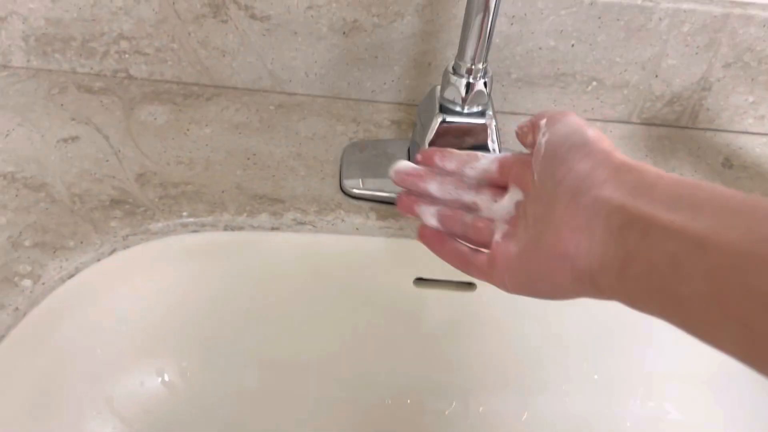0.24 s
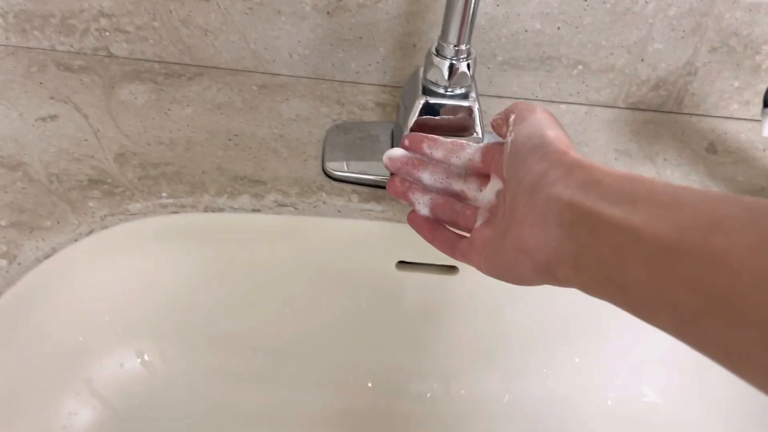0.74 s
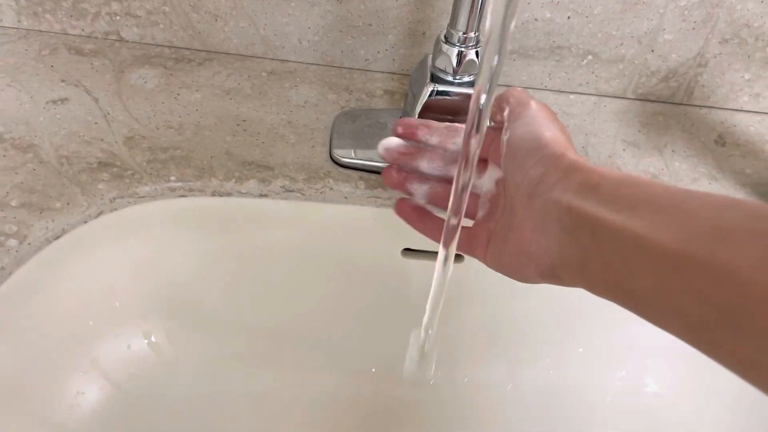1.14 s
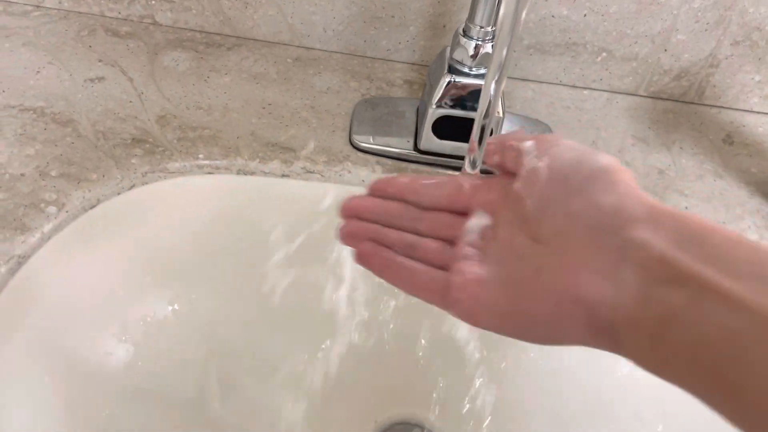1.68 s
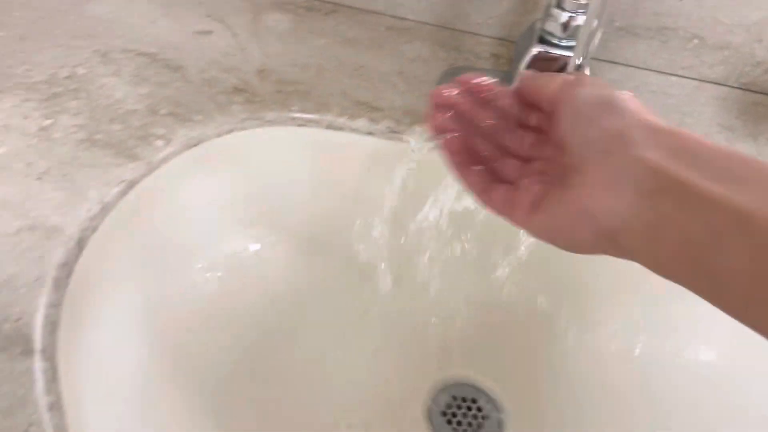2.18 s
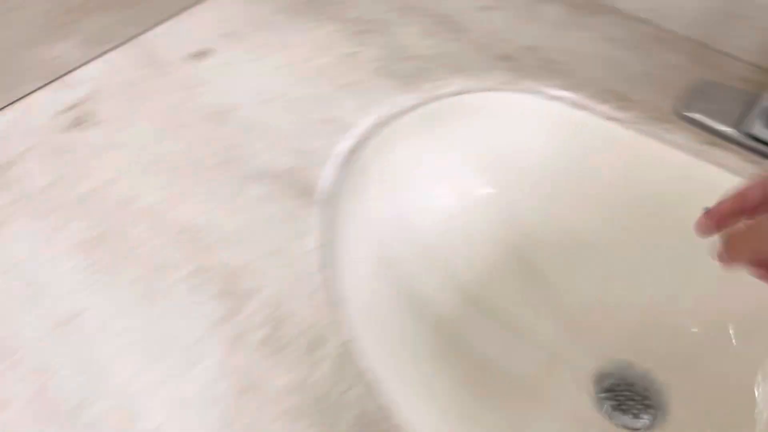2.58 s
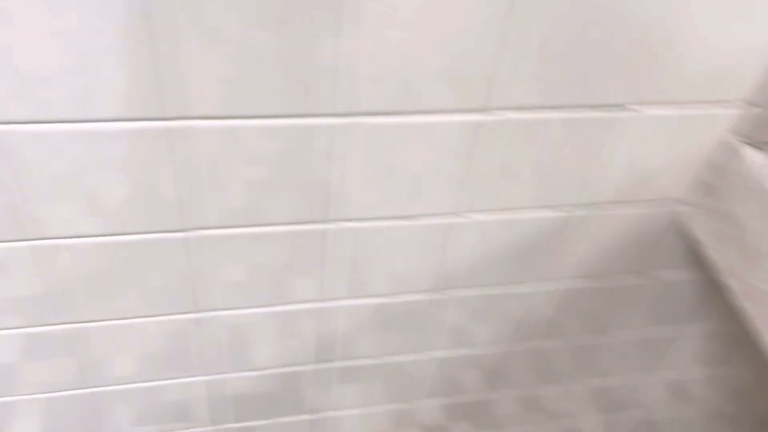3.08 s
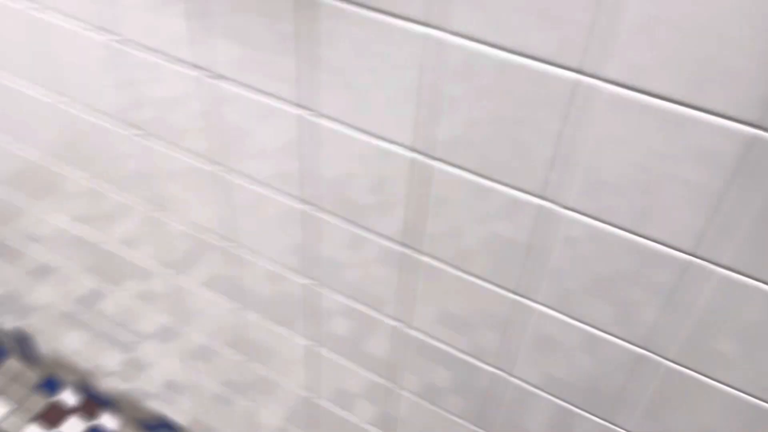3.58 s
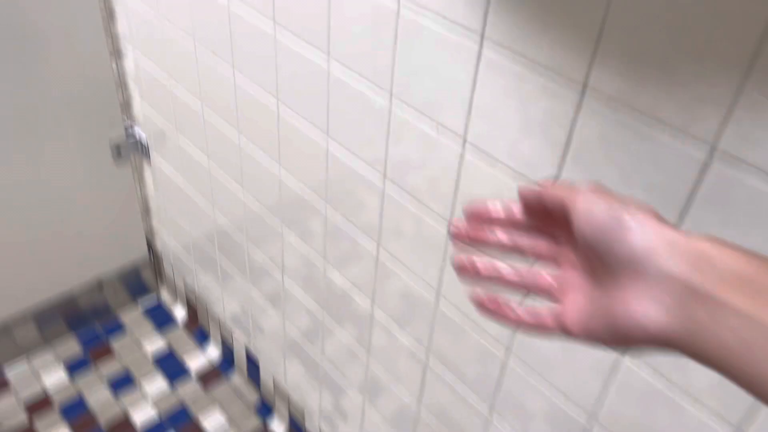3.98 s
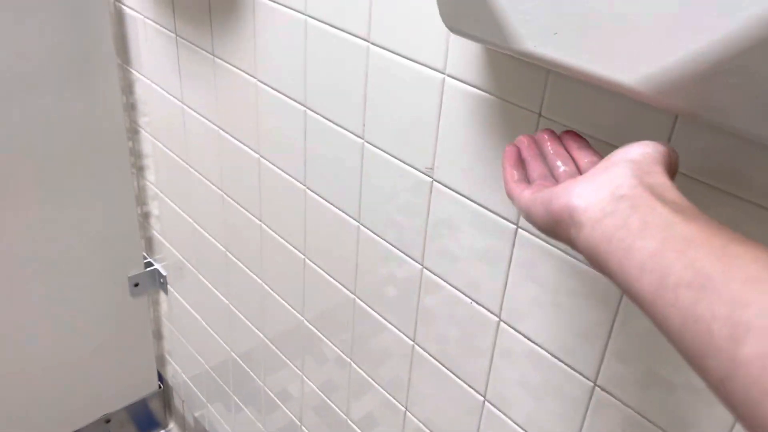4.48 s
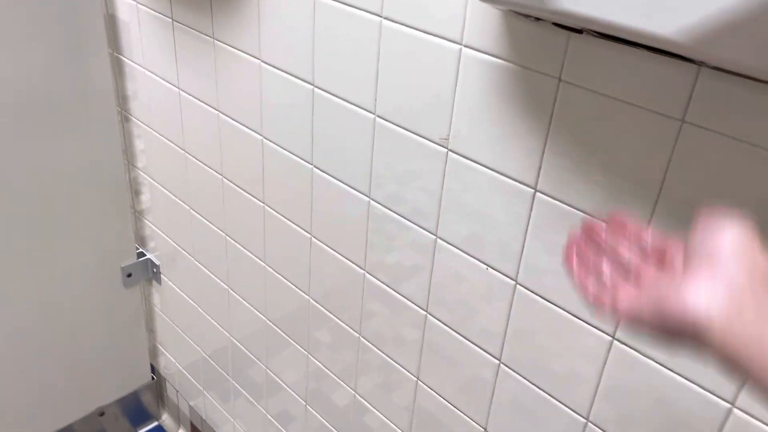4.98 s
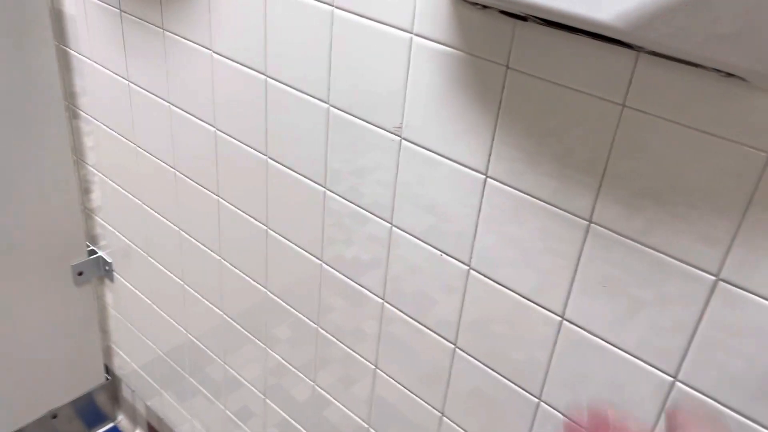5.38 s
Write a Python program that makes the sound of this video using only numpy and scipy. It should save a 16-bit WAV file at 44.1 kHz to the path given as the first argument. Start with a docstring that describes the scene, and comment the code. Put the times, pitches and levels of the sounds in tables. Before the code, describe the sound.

In a droning tiled restroom, a tap clicks open, hisses and splatters over a soapy hand, then turns distant and shuts off with a spurt.

```python
"""Tap in a tiled restroom.

Ventilation drones through the walls: noise in room resonances plus drifting hum and thin fan tones.
A quiet noise layer sets in abruptly before the tap. The tap clicks open: shaped noise sings in the pipe,
hisses from the aerator and sprays on hand and basin. Drops, foam and gulps are damped sines; knocks are
noise puffs with basin rings. The phone turns away from the basin to a tiled wall, near spray gives way
to spray off the tiles, the tap shuts and gives a last spurt.
"""
import sys
import numpy as np
from scipy import signal
from scipy.fft import rfft, irfft, next_fast_len
from scipy.io import wavfile
from scipy.ndimage import uniform_filter1d, map_coordinates

SR = 44100
rng = np.random.default_rng(int(sys.argv[2]) if len(sys.argv) > 2 else 0)


def wav_out(sig):
    """Save sig, one row per channel (or a flat mono array), as 16-bit PCM at SR to the path in sys.argv[1]."""
    wavfile.write(sys.argv[1], SR, np.round(np.clip(np.atleast_2d(sig).T, -1, 1) * 32767).astype(np.int16))


N = 248724  # samples


def amp(db):
    """dB to gain."""
    return 10 ** (np.asarray(db) / 20)


def unit(x):
    """x at rms 1."""
    return x / np.sqrt(np.mean(x ** 2) + 1e-20)


def between(pair, share):
    """Blend from the first value to the second."""
    return pair[0] + (pair[1] - pair[0]) * np.clip(share, 0, 1)


def along(points, hz, axis=1):
    """One column of a frequency table, read on a log axis."""
    p = np.transpose(points)
    return np.interp(np.log(hz + 1), np.log(p[0] + 1), p[axis])


def curves(rows):
    """One value per sample for each column after the time."""
    s, *cols = np.transpose(rows)
    return [np.interp(np.arange(N) / SR, s, c) for c in cols]


def wobble(rate_hz):
    """Smooth random curve, rate_hz knots a second."""
    knots = rng.standard_normal(int(N * rate_hz / SR) + 4)
    return map_coordinates(knots, [np.arange(N) * rate_hz / SR])


def filtered(x, response):
    """x times a complex response of frequency."""
    m = next_fast_len(N + SR // 2)
    spectrum = rfft(x, m) * response(np.fft.rfftfreq(m, 1 / SR))
    return irfft(spectrum, m)[..., :x.shape[-1]]


def peaks(modes):
    """Gain of resonances (frequency [Hz], width [Hz], level [dB]) whose powers add."""
    def gain(f):
        return np.sqrt(sum(amp(2 * db) * (f * w) ** 2 / ((c * c - f * f) ** 2 + (f * w) ** 2)
                           for c, w, db in modes))
    return gain


def shape(points):
    """Gain curve through a table (frequency [Hz], level [dB])."""
    return lambda f: amp(along(points, f))


# left-right correlation: (frequency [Hz], far from source [-1..1], near source [-1..1])
CORRELATION = [(100, 0.97, 0.69), (198, 0.72, .9), (360, 0.3, 0.9), (970, 0.05, 0.83), (2560, 0.15, 1),
               (3630, 0.3, 0.77), (4470, 0.88, 1), (5900, 0.1, 0.065), (7020, 1, 1), (10300, 0.89, 0.72),
               (11500, 1, 0.46), (12900, 0.85, 0.44), (14500, 1, 0.98)]


def rush(gain, near, patchy_db):
    """Stereo noise of rms 1: random time-frequency patches, mid/side mixed to the set correlation."""
    z = signal.stft(rng.standard_normal((2, N)), nperseg=256)[2]
    field = uniform_filter1d(rng.standard_normal(z.shape[1:]), 5, 0)
    field = uniform_filter1d(field, 8, 1)
    pair = signal.istft(z * amp(patchy_db * unit(field)), nperseg=256)[1][:, :N]

    def mid_side_gain(hz):
        angle = np.arccos(np.clip(along(CORRELATION, hz, axis=1 + near), -1, 1)) / 2
        return gain(hz) * [np.cos(angle), np.sin(angle)]

    mid, side = filtered(pair, mid_side_gain)
    return unit(np.array([mid + side, mid - side]))


def bubbles(s, db, hz, pan_db, cycles, rise, swell_cycles=0.73):
    """Trapped bubbles: damped sines that swell, die over some cycles and rise in pitch."""
    t = np.arange(SR // 25) / SR
    u = hz[:, None] * t  # cycles elapsed
    life = np.reshape(np.clip(cycles, 1, 30), (-1, 1))
    wave = np.sin(2 * np.pi * u * (1 + rise * np.minimum(u / life, 3)))
    wave = wave * np.exp(-u / life) * (1 - np.exp(-u / swell_cycles))
    at = ((s * SR).astype(int)[:, None] + np.arange(len(t))).ravel()

    def channel(side):
        gain = amp(db + side * pan_db / 2)[:, None]
        return np.bincount(at, (gain * wave).ravel(), N + SR)[:N]

    return np.array([channel(1), channel(-1)])


def spatter(s, db, t60_s):
    """Short noise bursts, as when a drop shatters."""
    t = np.arange(SR // 50) / SR
    at = ((s * SR).astype(int)[:, None] + np.arange(len(t))).ravel()
    burst = amp(db[:, None] - 60 * t / t60_s) * rng.standard_normal((len(s), len(t)))
    bursts = np.bincount(at, burst.ravel(), N + SR)[:N]
    return filtered(bursts, peaks([(3000, 2000, 0.004), (5850, 9700, 0.0069)]))


# tile decay: (frequency [Hz], t60 [s])
TILE_DECAY = [(200, 0.15), (2000, 0.23), (8000, 0.059), (15000, 0.029)]


def room(x):
    """Tiled walls: a noise tail, 130 samples late, each frequency dying at its own speed."""
    hz, t, z = signal.stft(rng.standard_normal((2, SR)), SR, nperseg=256)
    decay = amp(-60 * t / along(TILE_DECAY, hz)[:, None])
    tail = signal.istft(z * decay, SR, nperseg=256)[1]
    late = np.pad(x, (130, 0))[None]
    return signal.fftconvolve(late, tail / np.linalg.norm(tail[0]), axes=1)[:, :N]


OPEN_S, SHUT_S = .928, 4.932  # valve
# quiet noise layer: (frequency [Hz], level per Hz [dB])
LAYER_SHAPE = [(1500, -28), (3500, 3), (6000, -1), (10000, -3.5), (13000, -10), (15600, -20)]
LAYER_DB, LAYER_START_S, LAYER_RISE_S, LAYER_FADE_S = -75.5, 0.51, 0.03, 0.56  # fade starts at SHUT_S


def quiet_noise_layer():
    """Quiet shaped stereo noise: abrupt onset, level hold, linear fade."""
    t = np.arange(N) / SR
    rise = np.clip((t - LAYER_START_S) / LAYER_RISE_S, 0, 1)
    fade = np.clip(1 - (t - SHUT_S) / LAYER_FADE_S, 0, 1)
    return amp(LAYER_DB) * rise * fade * rush(shape(LAYER_SHAPE), near=0, patchy_db=3.5)


# phone place: (time [s], turn from basin to wall [0-1], distance from tap [arm lengths])
PHONE_PLACE = [(0, 0.02, 0.97), (2.4, 0.18, 0.98), (2.75, 0.44, 0.97), (3.0, 0.66, 1.14), (3.3, 1, 1.9),
               (3.6, 0.9, 3.3), (4.2, 0.82, 3.4), (5.64, 0.87, 1.7)]
# drone at the phone: (time [s], deep level [dB], upper level [dB])
DRONE_LEVEL = [(0, -29, -32.5), (.9, -32.5, -33), (1.5, -33.5, -34), (2.3, -33, -34.5), (2.7, -31.5, -37.5),
               (3.3, -33, -39.5), (3.9, -35.5, -43.5), (5.64, -34.5, -42)]
# room standing waves: (frequency [Hz], width [Hz], level [dB])
DEEP_MODES = [(39.5, 5.5, -1.5), (57, 14, -4), (75.4, 27.4, -8)]
UPPER_MODES = [(102, 4.8, -2.5), (117.7, 8.7, 1.5), (159, 5.1, -5.5), (177, 2.7, -19.5), (212, 25, -42)]
# fan motor hum, one row for deep, one for upper drone: (frequency [Hz], level before wobble [dB])
MOTOR_HUM = [(58, -1), (119.4, 3)]
DRONE_PAN_DB = (2, 0.2)  # left-right: facing basin, facing wall


def tone(hz, drift_hz):
    """Sine of rms 1 with a wandering pitch."""
    return np.sqrt(2) * np.sin(2 * np.pi * np.cumsum(hz + drift_hz * wobble(6)) / SR)


def drone(turned):
    """Noise in standing waves behind the walls' band limits, plus motor hum."""
    def walls(f):
        return 1 / (1 + (f / 230) ** 6) / (1 + (32 / (f + 1)) ** 5)

    out = 0
    for level_db, modes, (hz, db) in zip(curves(DRONE_LEVEL), (DEEP_MODES, UPPER_MODES), MOTOR_HUM):
        resonance = peaks(modes)
        waves = rush(lambda f: resonance(f) * walls(f), near=0, patchy_db=.8)
        hum = amp(db + 2 * wobble(9)) * tone(hz, 1.2)
        out = out + amp(level_db) * unit(waves + hum)
    pan_db = between(DRONE_PAN_DB, turned)
    return amp([pan_db / 2, -pan_db / 2]) * out


# duct air: (frequency [Hz], level per Hz [dB])
AIR_SHAPE = [(150, -20), (250, -1.5), (340, 3.5), (480, 0), (600, -5.5), (900, -10.5), (2070, -21),
             (4800, -29.5), (9000, -35), (12000, -45.5), (15600, -66.5)]
# fan tones: (frequency [Hz], relative level [dB])
FAN_TONES = [(345, -9), (518.4, 0), (1285, -21), (1347, -22), (2050, -20.5)]
# level common to the fan tones: (time [s], level [dB])
FAN_LEVEL = [(0, -67), (2.9, -68.5), (3.3, -70), (3.85, -60), (4.2, -65), (4.4, -58), (5.1, -62.5),
             (5.64, -59)]
AIR_DB, AIR_RUNNING_DB, AIR_MIDTURN_DB = -57.5, 3.5, 2  # base, gain while tap runs, gain midway in turn
AIR_SWELL_S = 0.45  # swell ends as the valve opens; fall starts as it shuts


def ventilation():
    """Drone, broadband duct air and thin fan tones."""
    t, turned = np.arange(N) / SR, curves(PHONE_PLACE)[0]
    running = np.minimum(t - OPEN_S + AIR_SWELL_S, SHUT_S + AIR_SWELL_S - t) / AIR_SWELL_S
    air_db = AIR_DB + AIR_RUNNING_DB * np.clip(running, 0, 1) + 0.28 * wobble(0.47)
    air_db = air_db + AIR_MIDTURN_DB * np.sin(np.pi * np.clip(turned, 0, 1))
    air = amp(air_db) * rush(shape(AIR_SHAPE), near=0, patchy_db=2.0)
    fan_db = curves(FAN_LEVEL)[0]
    fan = sum(amp(fan_db + db + 1.6 * wobble(5.0)) * tone(hz, hz / 300) for hz, db in FAN_TONES)
    return drone(turned) + air + fan


# valve, pipe and hand, relative levels:
# (time [s], thud [dB], low ring [Hz], low ring [dB], higher rings [dB])
KNOCK_EVENTS = [(0.925, -33.5, 209, -32.5, -28), (1.192, -27.5, 191, -36, -37), (1.232, -36, 186, -36, -45),
                (1.326, -34.5, 200, -35, -44), (1.863, -35, 190, -72, -64), (2.091, -43.5, 203, -69, -36),
                (2.506, -36, 204, -72, -46), (2.534, -33, 203, -74, -42), (2.7, -38, 205, -59, -38),
                (2.755, -33.5, 207, -53, -40), (2.769, -47.5, 205, -55, -37), (2.981, -36.5, 205, -50, -44),
                (2.998, -37, 203, -62, -46), (3.162, -56, 206, -39.5, -47), (3.915, -39, 218, -41.5, -47),
                (3.931, -42, 215, -60, -63), (4.735, -63, 219, -35.5, -57), (5.49, -46.5, 206, -63, -48),
                (5.504, -50, 207, -63, -61)]
# counter and basin higher rings: (frequency [Hz], relative level [dB], t60 [s])
BASIN_RINGS = [(352, -1, 0.1), (486, -7, 0.058), (890, -1.5, 0.036)]
LOW_RING_DB, LOW_RING_T60_S = 6.1, 0.14  # relative; pitch depends on the place struck
THUD_T60_S, THUD_ATTACK_S, RING_ATTACK_S = 0.064, 0.0015, 0.0058


def knocks():
    """Each knock: a noise puff plus decaying basin modes at random strengths."""
    out, t = np.zeros(N + SR), np.arange(SR // 4) / SR
    for s, thud_db, low_hz, low_db, high_db in KNOCK_EVENTS:
        low_env = amp(low_db + LOW_RING_DB - 60 * t / LOW_RING_T60_S)
        ring = low_env * np.sin(2 * np.pi * low_hz * t)
        for hz, db, t60_s in BASIN_RINGS:
            env = amp(db + high_db + rng.normal(0, 2.3) - 60 * t / t60_s)
            ring = ring + env * np.sin(2 * np.pi * hz * t)
        poles = np.convolve([1, -1.68, .72], [1, -.93])
        puff = signal.lfilter([1, -1], poles, rng.standard_normal(len(t)))
        thud = unit(puff) * amp(thud_db - 8 - 60 * t / THUD_T60_S)
        ring = amp(-1.5) * ring * (1 - np.exp(-t / RING_ATTACK_S))
        out[round(s * SR):][:len(t)] += ring + thud * (1 - np.exp(-t / THUD_ATTACK_S))
    return out[:N]


# bubble-trapping drops: (time [s], relative level [dB], frequency [Hz], left-right [dB])
DROP_EVENTS = [(1.402, -34, 3060, -1), (1.404, -22.5, 6290, 7), (1.5417, -34, 2910, 1),
               (1.6223, -27, 4840, 2.5), (1.641, -29.5, 3240, 4), (1.6555, -23, 3080, 6.5),
               (1.658, -23, 4500, 2.5), (1.6671, -28, 3140, -6), (1.682, -32, 6000, 3),
               (1.706, -23.5, 5530, 10.5), (1.716, -31.5, 4700, 3), (1.722, -29.5, 4040, 2),
               (1.766, -24, 5240, 4), (1.826, -29.5, 2190, -1), (1.862, -25.5, 3010, 8),
               (1.875, -24, 3430, 3.5), (1.91, -22.5, 4640, 5), (1.925, -17, 3610, 8),
               (1.9216, -22.5, 5600, 9), (1.938, -30.5, 3660, 1), (1.968, -26.5, 4020, 5),
               (1.9954, -26.5, 5840, -1), (2.0049, -22, 5670, 9.5), (2.039, -24.5, 4330, 5),
               (2.042, -25.5, 5000, -0.5), (2.044, -28.5, 3400, 4), (2.0706, -31, 4080, 3),
               (2.096, -39.5, 2550, -5), (2.134, -28, 4480, -1.5), (2.135, -33, 2600, -2.5),
               (2.1676, -35, 5860, 3), (2.2046, -19.5, 4620, -0.5), (2.218, -22, 4040, -2.5),
               (2.23, -21.5, 5730, 3.5), (2.2336, -29, 2610, -3), (2.255, -21, 5770, 8),
               (2.278, -22, 5460, 2), (2.2971, -28, 2700, 2), (2.313, -26, 6200, 2), (2.339, -27, 4570, -4),
               (2.3997, -25.5, 6270, 11.5), (2.423, -18, 5300, 3.5), (2.4226, -21, 6600, 3.5),
               (2.424, -38.5, 2880, -7), (2.4307, -30.5, 5570, 0.5), (2.507, -29.5, 4300, -1.5),
               (2.515, -29.5, 4100, -1), (2.519, -26, 2806, 0), (2.541, -27, 3320, 6),
               (2.536, -22, 5300, 3.5), (2.546, -25, 3620, 4), (2.5833, -24, 4320, -1.5),
               (2.64, -35.5, 2800, 0.5), (2.644, -32.5, 4870, -1), (2.762, -38.5, 3300, 7),
               (2.7684, -40, 2720, 12)]
DROP_CYCLES, DROP_CYCLES_SCATTER = 5.43, 0.22  # median life, log scatter
AFTER_S, AFTER_DB, AFTER_SPREAD = .016, -15, .25  # later drops: delay range, least level, pitch spread


def drops():
    """Trapped bubbles plink, splash crowns tick and shatter, three later small drops follow each."""
    s, db, hz, pan_db = np.transpose(DROP_EVENTS)
    cycles = DROP_CYCLES * np.exp(DROP_CYCLES_SCATTER * rng.standard_normal(len(s)))
    out = bubbles(s, db + 3.5, hz, pan_db, cycles, rise=0.03, swell_cycles=1.0)
    # crown ticks below and above the bubble's pitch
    for lo, hi in [(.68, 0.96), (1.2, 1.6)]:
        crown_hz = hz * rng.uniform(lo, hi, len(s))
        out = out + bubbles(s, db - 6.0, crown_hz, pan_db, cycles=1.1, rise=.02, swell_cycles=0.32)
    out = out + amp([[1.5], [-1.5]]) * spatter(s, db - 7, t60_s=.012)
    for delay, level, pitch in rng.random((3, 3, len(s))):
        after_s = s + AFTER_S * (0.17 + delay)
        after_db = db + AFTER_DB + 6 * level
        after_hz = hz * (1 + AFTER_SPREAD * (2 * pitch - 1))
        out = out + bubbles(after_s, after_db, after_hz, pan_db, cycles=8.8, rise=0.035)
    return out


# soap foam on the hand: (time [s], relative level [dB], frequency [Hz])
FOAM_EVENTS = [(.042, -54, 5650), (.069, -53.5, 2200), (0.072, -53.5, 1950), (.075, -58, 1464),
               (.078, -63.5, 4320), (.1, -66, 2065), (.13, -67, 5200), (.154, -61.5, 4200),
               (.17, -65, 4400), (.18, -61, 10800), (.192, -65, 9200), (.432, -64, 10800),
               (.209, -60.5, 2580), (.214, -55, 1466), (.215, -57.5, 1970), (.216, -60.5, 947),
               (.224, -63, 2530), (.26, -59, 4230), (0.264, -53.5, 1785), (0.263, -55, 955),
               (.271, -61, 800), (.316, -57, 4330), (.325, -57, 4400), (.344, -49.5, 3410),
               (.344, -49.5, 4260), (0.342, -55, 1100), (.356, -58.5, 3300), (.407, -67, 2850),
               (.464, -60.5, 3300), (.464, -64, 4280), (.464, -66, 1990)]
FOAM_CYCLES, FOAM_SPREAD, FOAM_SMEAR_S = 7.5, 0.03, .005


def foam():
    """Each squelch: three bubbles near in pitch and time, plus a noise tick."""
    s, db, hz = np.transpose(FOAM_EVENTS)
    out = spatter(s, db - 27, t60_s=0.015)
    for k, (delay, pitch) in enumerate(rng.random((3, 2, len(s)))):
        near_s = s + k * FOAM_SMEAR_S * delay
        near_hz = hz * (1 + FOAM_SPREAD * (2 * pitch - 1))
        out = out + bubbles(near_s, db - 1.8 * k, near_hz, 0 * s, FOAM_CYCLES, rise=0.0032, swell_cycles=0.42)
    return out


# large bubbles at spout or drain: (time [s], relative level [dB], frequency [Hz])
GULP_EVENTS = [(1.04, -44, 1203), (1.194, -41, 1870), (1.194, -39, 523), (1.196, -52, 1100),
               (1.232, -35, 504), (1.256, -39, 480), (1.287, -41, 481), (1.322, -39.5, 500),
               (1.227, -41.5, 1850), (1.229, -40.5, 2280), (1.238, -37, 1140), (1.244, -34, 1266),
               (1.252, -40, 1410), (1.262, -35, 1850), (1.285, -38.5, 2450), (1.287, -38.5, 1150),
               (1.301, -37, 1127), (1.308, -39.5, 1230), (1.316, -43.5, 2470), (1.3516, -37.5, 1247),
               (1.373, -45.5, 1270), (2.466, -53, 1170), (2.534, -44, 1200), (2.536, -46.5, 1450),
               (2.663, -48, 1350), (2.705, -51, 780), (2.761, -38.5, 417), (2.803, -47, 1670),
               (3.042, -48, 1275), (3.151, -51, 1335), (4.951, -56, 1320), (5.03, -55, 1240),
               (5.109, -52.5, 1270)]
GULP_FACTOR, GULP_LAW = 0.051, 0.76  # cycles of life = factor * Hz ** law


def gulps():
    """Air leaves as large low bubbles; first water on the palm gurgles in a random cluster."""
    s, db, hz = np.transpose(GULP_EVENTS)
    out = bubbles(s, db, hz, 0 * s, cycles=GULP_FACTOR * hz ** GULP_LAW, rise=0.0085)
    time, level, pitch = rng.random((3, 20))
    gurgle = bubbles(1.19 + .16 * time, -50 + 8 * level, 900 * 3 ** pitch, 0 * time, cycles=7, rise=.03)
    return out + gurgle


# stream on palm, then basin, at arm's length: (time [s], splash level [dB], aerator hiss level [dB])
SPLASH_LEVEL = [(.93, -64.5, -48.5), (.97, -66, -48), (1.0, -60.5, -40), (1.3, -38, -38.5),
                (1.6, -54.5, -38), (1.65, -36, -43), (1.73, -30, -37), (2.3, -31, -33.5),
                (2.55, -31.5, -30.5), (3.0, -34, -44), (5.0, -38, -39)]
OPENING_S = 0.0067  # last 60 dB of the valve's rise
CLOSING_DB_PER_S, PIPE_LINGERS_DB_PER_S = 173, 88  # flow decay; the pipe's is slower by the second
PIPE_DB, PIPE_SAG_DB_PER_S, PIPE_SPREAD = -48.5, 2.5, 0.32  # base, pressure sag, share of distance law
SURGE_DB, SURGE_S = 10, 0.037  # pipe's first surge, time constant
HOLLOW_DB, HOLLOW_SPREAD, FILL_S = -52.5, 0.45, 0.039  # base, share of distance law, spout fill time
AERATOR_SHADOW_DB, SPRAY_SHADOW_DB, HOLLOW_SHADOW_DB = -17, -17, -18  # at full turn
TILES_DB = (-5, 1)  # tile spray re splash: facing basin, facing wall


def water_levels():
    """dB of pipe, aerator, near spray, tile spray and hollow: valve, splash, distance and turn."""
    t = np.arange(N) / SR
    turned, arms = curves(PHONE_PLACE)
    splash_db, hiss_db = curves(SPLASH_LEVEL)
    since_open, since_shut = np.clip(t - OPEN_S, 0, None), np.clip(t - SHUT_S, 0, None)
    valve_db = 60 * np.clip((t - OPEN_S) / OPENING_S, -2, 0) - CLOSING_DB_PER_S * since_shut
    spread_db = -20 * np.log10(np.clip(arms, .1, None))
    reach_db = valve_db + spread_db
    pipe_db = PIPE_DB + SURGE_DB * np.exp(-since_open / SURGE_S) - PIPE_SAG_DB_PER_S * since_open
    pipe_db = pipe_db + PIPE_SPREAD * spread_db + valve_db + PIPE_LINGERS_DB_PER_S * since_shut
    aerator_db = hiss_db + AERATOR_SHADOW_DB * turned + reach_db
    spray_db = splash_db + SPRAY_SHADOW_DB * turned + reach_db
    tiles_db = splash_db + between(TILES_DB, turned) + reach_db
    fill_db = 20 * np.log10(np.clip(since_open / FILL_S, .01, 1))
    hollow_db = HOLLOW_DB + fill_db + HOLLOW_SHADOW_DB * turned + HOLLOW_SPREAD * spread_db + valve_db
    return pipe_db, aerator_db, spray_db, tiles_db, hollow_db


def droplets(spray_db):
    """900 tiny bubbles ride on the spray; the long-tailed levels leave most lost in the hiss."""
    time, size, pitch, pan = rng.random((4, 900))
    s = 1.2 + 1.85 * time
    db = spray_db[(s * SR).astype(int)] + np.minimum(-4 * np.log(size) - 1.5, 13)
    return bubbles(s, db, 2600 * 2.3 ** pitch, 14 * pan - 3, cycles=1.14, rise=0.022, swell_cycles=1.0)


# resonances: (frequency [Hz], width [Hz], level [dB])
PIPE_MODES = [(1247, 35, -1.5), (1587, 32, -4), (1876, 49, -9), (2240, 110, -7.5), (2453, 32, 3),
              (2840, 58, 1), (3300, 45, -5.5), (3453, 30, -3.5), (3690, 45, -6), (3810, 54, -6),
              (4470, 500, -11.5), (4790, 33, -6), (5140, 28, 2.5), (5420, 100, 0), (5800, 50, -4),
              (6220, 190, -4.5)]
AERATOR_MODES = [(5130, 70, 2), (9600, 500, -1), (10550, 700, 0), (11100, 400, -4), (7000, 1500, -8),
                 (8200, 900, 0), (14300, 900, -10), (15500, 800, -12)]
HOLLOW_MODES = [(1040, 30, -1), (1115, 35, 2.5), (1200, 30, -1)]
SPURT_MODES = [(8400, 1500, -6), (10200, 600, 0), (11800, 700, 0), (14000, 3000, -14), (4000, 4000, -24)]
# spray on skin and basin: (frequency [Hz], level per Hz [dB])
SPRAY_SHAPE = [(500, -40), (1900, -22), (2300, -17), (2420, -11), (2600, -17), (4400, -16), (5900, -12),
               (6200, -7), (6500, -9), (7900, -2.5), (8600, -6), (9250, -3), (9560, 1.5), (9900, -6.5),
               (12000, -4.5), (13200, -3), (13800, -7), (15600, -1.5)]
# spray mixed by the walls: (frequency [Hz], level per Hz [dB])
TILE_SPRAY_SHAPE = [(900, -30), (2000, -18), (3600, -15), (4300, -21), (5600, -11), (6500, -7), (7500, 0),
                    (8300, -1.5), (9500, -2.5), (10400, -5.5), (12200, -4), (13400, -5.5), (15600, -3.5)]
SPURT_S, SPURT_DB, SPURT_RISE_DB_PER_S, SPURT_FALL_DB_PER_S = 5.264, -49.5, 4000, 327  # peak time, level


def stream():
    """Flow noise: singing pipe, hollow spout, aerator hiss, spray near and off tiles, last spurt."""
    pipe_db, aerator_db, spray_db, tiles_db, hollow_db = water_levels()
    pipe = 0
    for k in range(3):  # every third resonance wobbles together
        pipe = pipe + amp(pipe_db - 5 + 2 * wobble(9)) * rush(peaks(PIPE_MODES[k::3]), near=1, patchy_db=1.8)
    hollow = amp(hollow_db + 0.3 * wobble(8)) * rush(peaks(HOLLOW_MODES), near=1, patchy_db=-2.0)
    aerator = amp(aerator_db + 2.0 * wobble(20)) * rush(peaks(AERATOR_MODES), near=1, patchy_db=2.0)
    spray = amp(spray_db + 1.0 * wobble(36.0)) * rush(shape(SPRAY_SHAPE), near=1, patchy_db=5.5)
    tiles = amp(tiles_db + 0.46 * wobble(22)) * rush(shape(TILE_SPRAY_SHAPE), near=0, patchy_db=2.5)
    late_s = np.arange(N) / SR - SPURT_S
    spurt_db = SPURT_DB + np.minimum(SPURT_RISE_DB_PER_S * late_s, -SPURT_FALL_DB_PER_S * late_s)
    spurt = amp(spurt_db) * rush(peaks(SPURT_MODES), near=1, patchy_db=.8)
    return pipe + hollow + aerator + spray + tiles + spurt, droplets(spray_db)


def scene():
    """Ventilation, quiet noise, water and knocks; the sharp sounds echo off the tiles."""
    flow, tiny = stream()
    sharp = tiny + drops() + foam() + gulps() + knocks()
    return quiet_noise_layer() + ventilation() + flow + sharp + amp(-14) * room(sharp.mean(0))


# phone's stereo pair: (frequency [Hz], left phase lead [rad], left-right [dB])
STEREO_PAIR = [(100, 0, 0), (250, 0, .5), (700, 0, 2.5), (1200, 0, 0), (2300, 0, 1), (3100, .8, 2),
               (3800, .6, 2), (4500, 0, 2), (5900, 0, 2), (6500, -3, 1), (8000, -3.4, 0), (8700, -4, 0),
               (10200, -6.2, 0), (12000, -6.4, 0), (13400, -9.2, 0), (15800, -9.6, 0)]
TOP_HZ = 15750


def record(dry):
    """Phone channels: phase and level differ by frequency, band limited at TOP_HZ."""
    def response(hz):
        half = np.exp(.5j * along(STEREO_PAIR, hz)) * amp(along(STEREO_PAIR, hz, axis=2) / 2)
        return np.array([half, 1 / half]) * (hz < TOP_HZ)

    edge = SR // 10
    padded = np.pad(dry, [(0, 0), (edge, edge)], "reflect")  # sound continues past both ends
    return filtered(padded, response)[:, edge:-edge]


dry = scene()
out = record(dry)
wav_out(out)
```